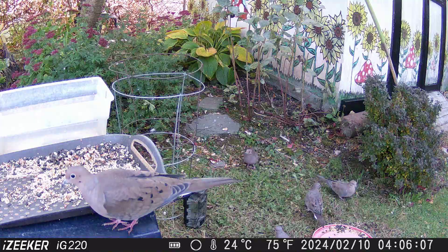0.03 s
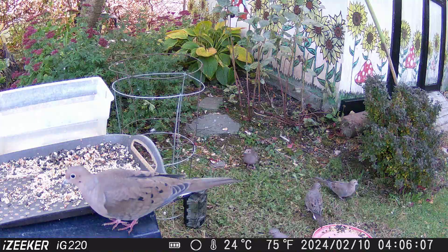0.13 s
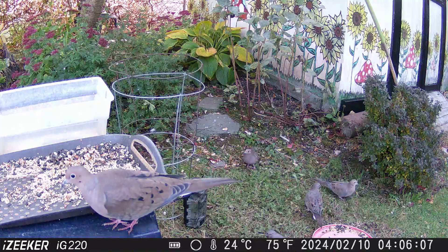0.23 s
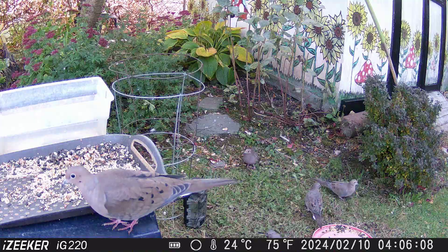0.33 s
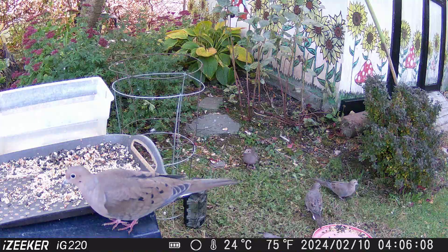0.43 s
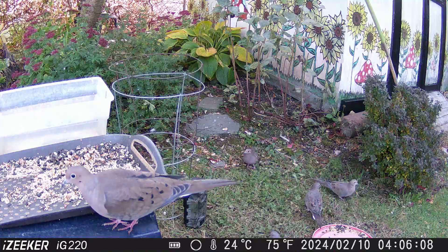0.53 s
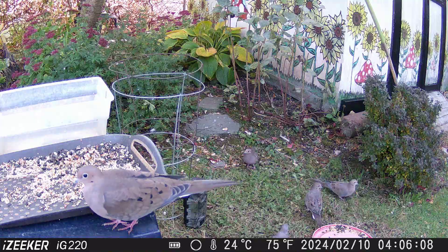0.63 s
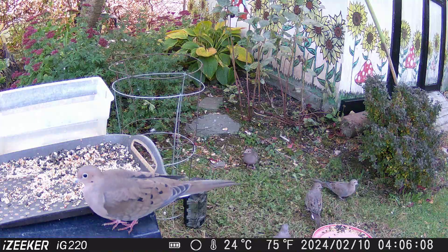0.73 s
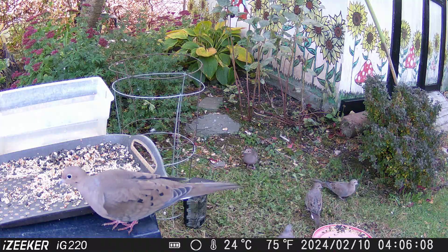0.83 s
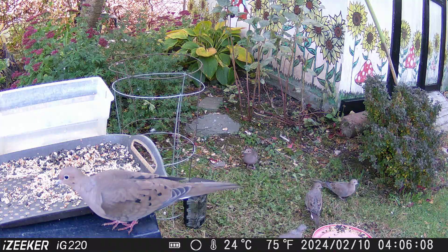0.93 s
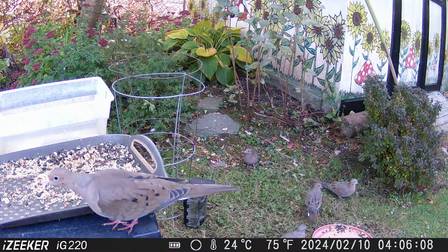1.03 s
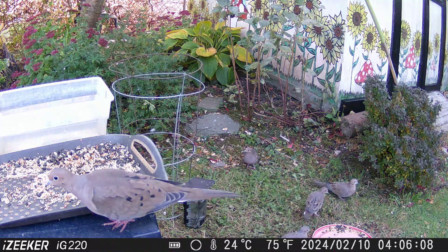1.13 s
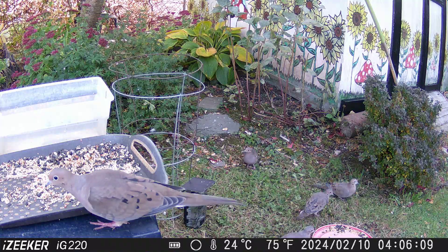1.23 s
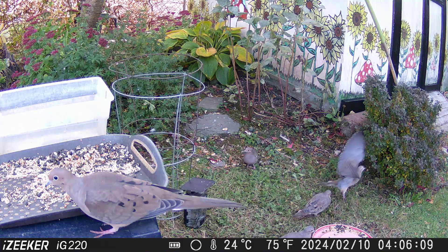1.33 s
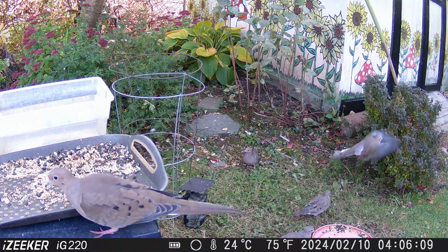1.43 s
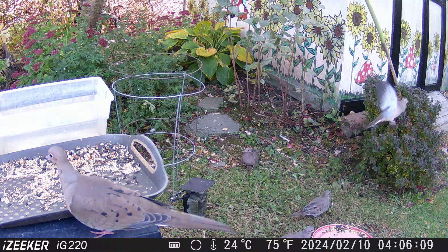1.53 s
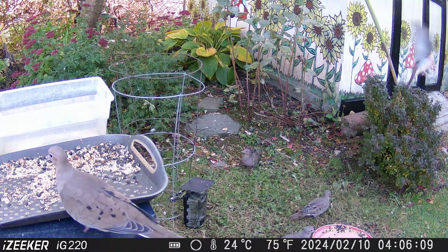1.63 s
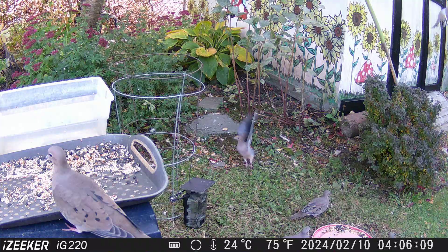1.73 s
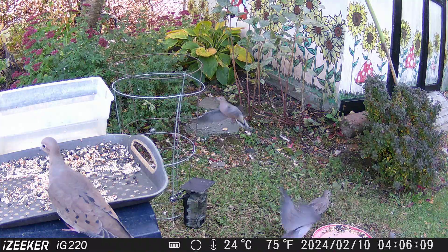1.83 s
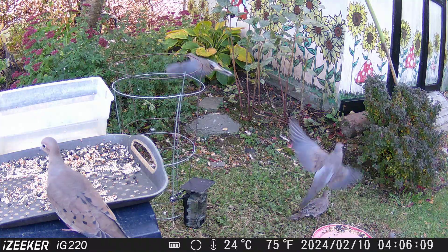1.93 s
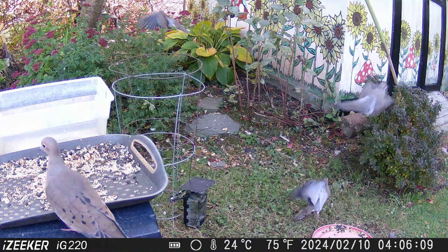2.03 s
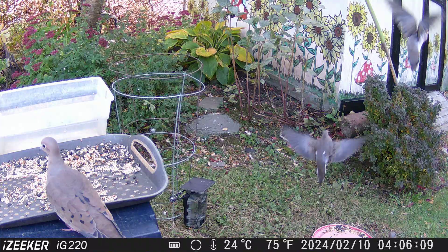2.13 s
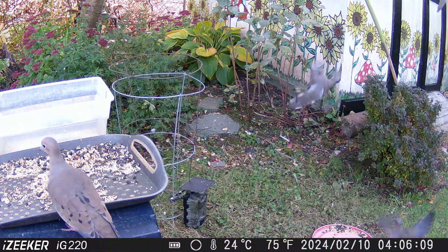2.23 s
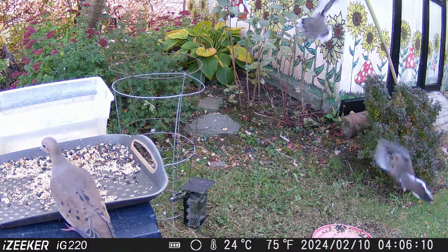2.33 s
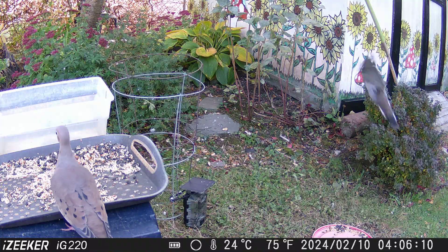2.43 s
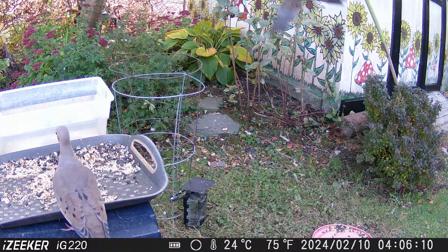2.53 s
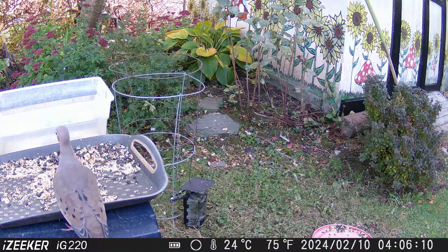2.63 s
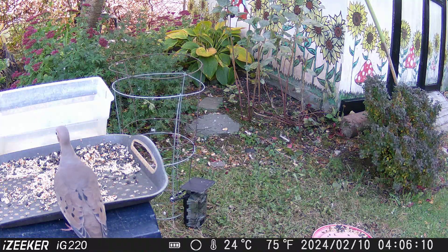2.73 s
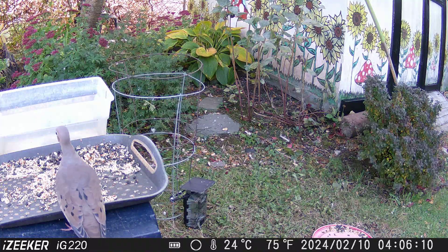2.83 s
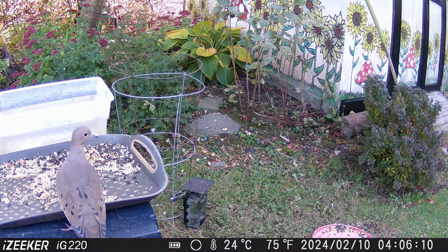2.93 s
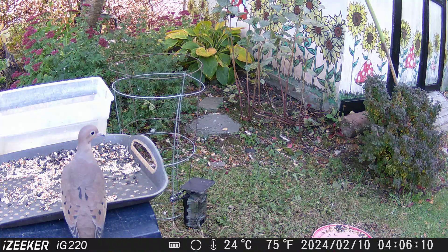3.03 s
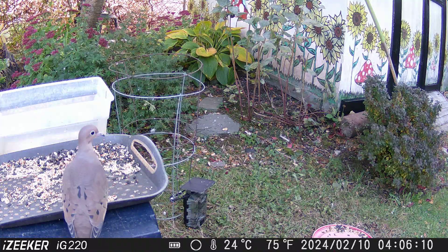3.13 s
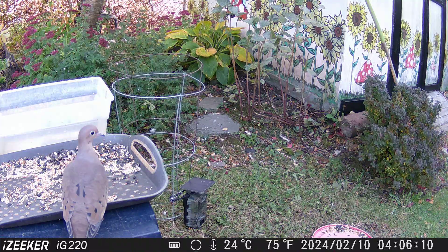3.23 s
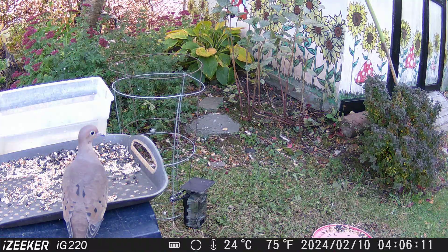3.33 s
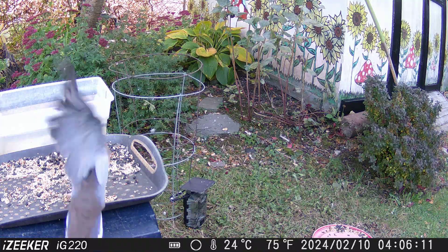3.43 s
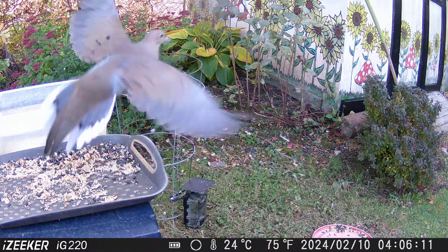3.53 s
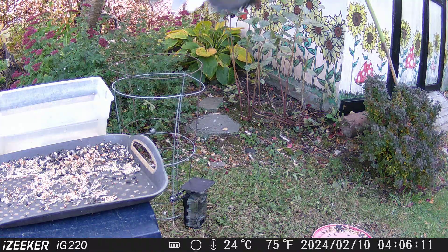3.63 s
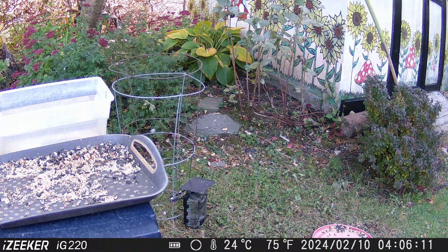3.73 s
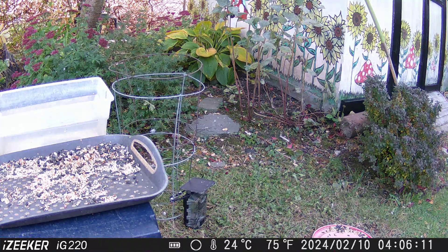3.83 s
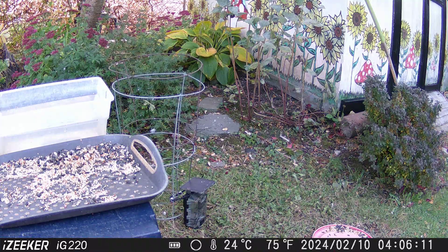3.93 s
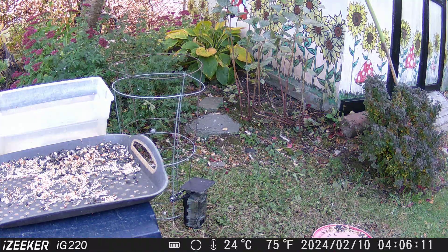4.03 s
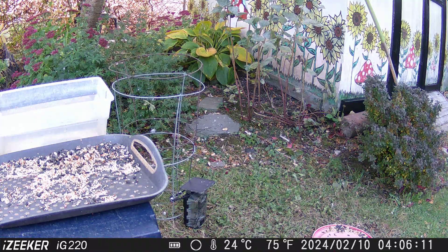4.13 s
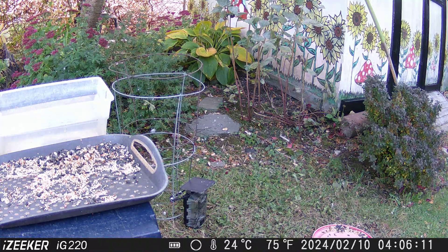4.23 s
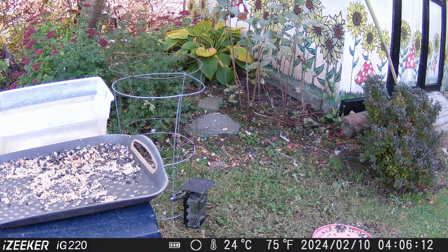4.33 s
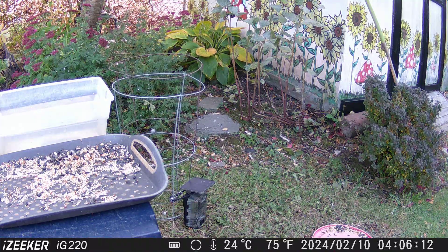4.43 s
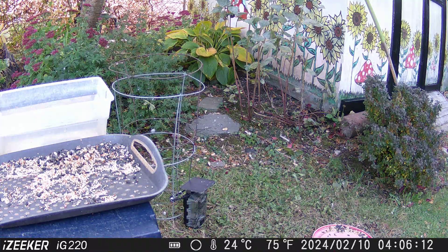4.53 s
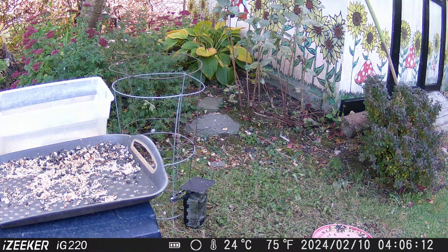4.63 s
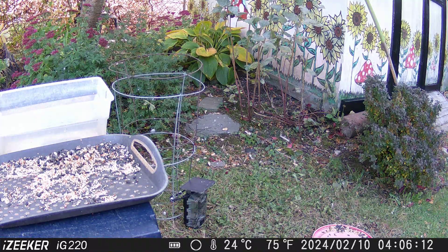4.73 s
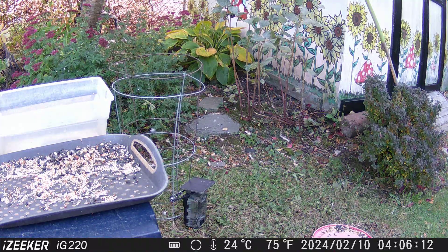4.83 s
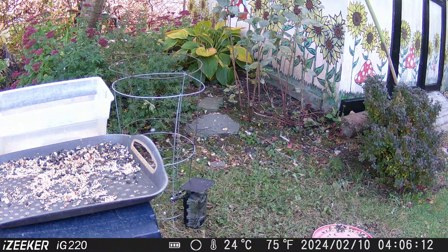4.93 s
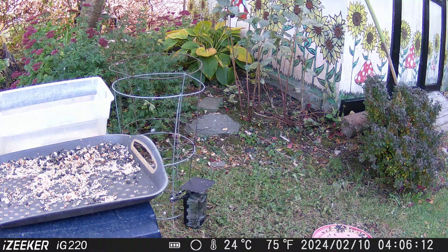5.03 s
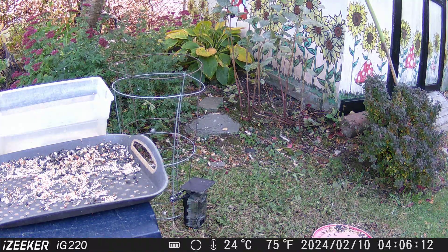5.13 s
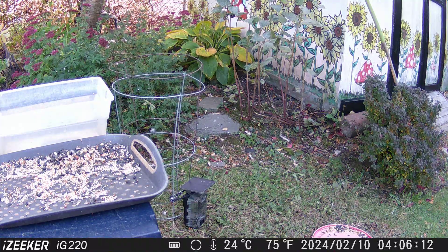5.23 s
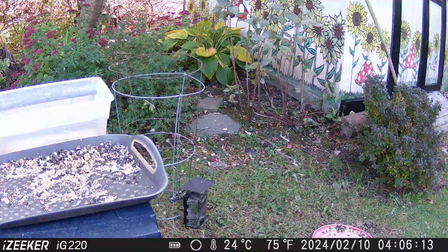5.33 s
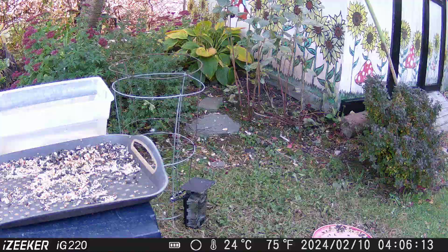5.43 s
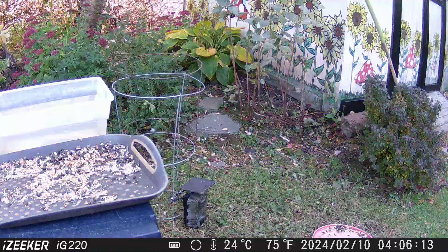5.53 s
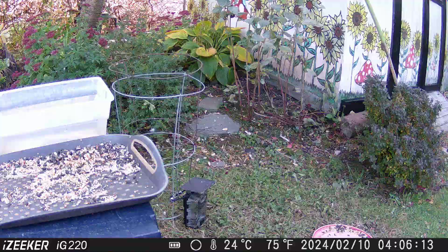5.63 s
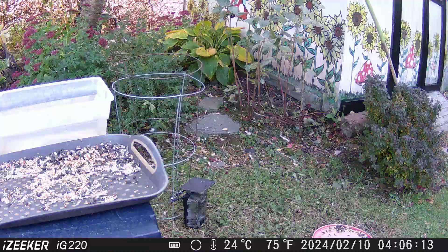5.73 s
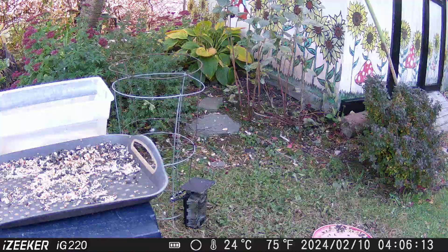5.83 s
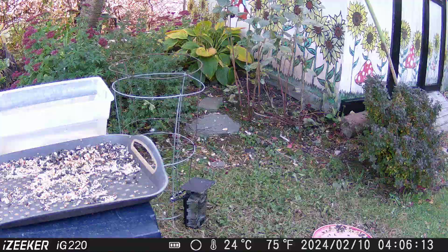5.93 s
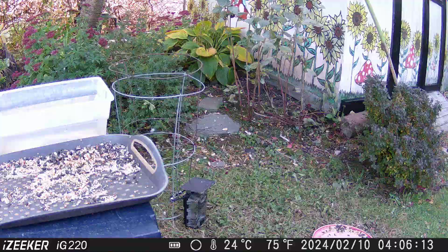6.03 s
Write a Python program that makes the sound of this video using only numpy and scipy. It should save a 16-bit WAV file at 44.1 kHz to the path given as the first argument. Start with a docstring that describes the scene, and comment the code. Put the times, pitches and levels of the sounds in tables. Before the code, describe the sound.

In a quiet backyard with a low, far-off town hum and one faint early knock, a group of doves suddenly takes off. Dry wing claps, rustling feathers and thumping air come first, then hollow fluttering slaps and quick high whistles on every beat. A last close bird bursts up loudly and whistles away. The hum remains, then a soft flurry and dull knocks. A small camera microphone close by gives limited treble.

```python
"""Over a steady distant town hum and a faint early knock, mourning doves burst up from a back yard.
Wing tips clap, and flurries of filtered noise rustle and push air, then fade as the birds leave.
Trapped air slaps in short falling tones; gliding tones whistle on each downstroke, with a lower,
softer note on each upstroke. Short yard echoes follow the wings; a last soft flurry and dull knocks
(ringing sines under noise) end it, all through the limited treble of a small trail camera."""
import sys
import numpy as np
from scipy import signal
from scipy.fft import rfft, irfft, next_fast_len
from scipy.io import wavfile
from scipy.ndimage import uniform_filter1d

SR = 44100
rng = np.random.default_rng(int(sys.argv[2]) if len(sys.argv) > 2 else 0)


def waveform_to_disk(signal):
    """Save audio, clipped to [-1, 1], as 16-bit WAV at the path in sys.argv[1]."""
    frames = np.transpose(np.atleast_2d(signal))
    scaled = np.clip(frames, -1, 1) * 32767
    samples = np.round(scaled).astype(np.int16)
    wavfile.write(sys.argv[1], SR, samples)


N = 268789
T = np.arange(N) / SR
SIZE = next_fast_len(N, real=True)
FREQS = np.fft.rfftfreq(SIZE, 1 / SR)

# Spectra give only a tone colour; the sound that uses one sets its strength.
# broad breath of vanes through air: (frequency [Hz], relative level per Hz [dB])
SWISH_SPECTRUM = [(120, -20.5), (250, 1), (600, 1), (1000, 0), (1600, -3), (2300, -3.5), (3100, -19.5),
                  (4500, -34.5), (9000, -41.5)]
# bright scrape of quills: (frequency [Hz], relative level per Hz [dB])
FIZZ_SPECTRUM = [(1000, -22.5), (2500, -5.5), (3500, -13.5), (4700, -23), (6000, -8.5), (7200, 4),
                 (8200, -11.5), (9000, -25.5)]


def gain_of(db):
    """Decibels to amplitude."""
    return 10 ** (np.asarray(db) / 20)


def evened(x):
    """Scales to unit rms."""
    return x / np.sqrt(np.mean(x ** 2) + 1e-20)


def steadied(x, size):
    """Evens out a noise's chance swells over `size` samples, so an envelope can set its strength."""
    return x / np.sqrt(uniform_filter1d(x ** 2, size=size) + 1e-6)


def add(mix, start_s, sound):
    """Mixes a sound in at its start time."""
    part = mix[round(start_s * SR):][:len(sound)]
    part += sound[:len(part)]


def coloured(x, spectrum):
    """Filters x by a spectrum, joined up over log frequency, at unit rms."""
    hz, db = np.transpose(spectrum)
    gain = gain_of(np.interp(np.log(FREQS + 1), np.log(hz + 1), db))
    return evened(irfft(rfft(x, SIZE) * gain, SIZE)[:N])


def noise(spectrum):
    """Random noise of a given spectrum, at unit rms."""
    return coloured(rng.standard_normal(N), spectrum)


def wander(rate_hz):
    """A smooth random curve: noise kept mostly below the given rate, at unit rms."""
    lowpass = 1 / (1 + (FREQS / rate_hz) ** 4)
    return evened(irfft(rfft(rng.standard_normal(SIZE)) * lowpass, SIZE)[:N])


def bursts(times, dbs, decay, rise):
    """An envelope of quick rises and exponential falls, both with time constants in seconds."""
    out, t = np.zeros(N), np.arange(SR // 3) / SR
    shape = (1 - np.exp(-t / rise)) * np.exp(-t / decay)
    for start, db in zip(times, dbs):
        add(out, start, gain_of(db) * shape)
    return out


def yard():
    """The steady far hum of the town, as noise weighted to the lows."""
    # town hum: (frequency [Hz], relative level per Hz [dB])
    hum_spectrum = [(12, -40.5), (20, 2), (92, -0.5), (158, -11), (194, -11.5), (232, -14.5), (331, -22),
                    (416, -21), (449, -24), (918, -19.5), (1880, -33.5), (2130, -34.5), (4700, -60.5),
                    (7630, -47.5), (8890, -71), (11600, -87), (19600, -120)]
    return gain_of(-49) * noise(hum_spectrum)


def knocks(clatter_decay):
    """Distant bumps: a hollow body rings in decaying sines under a short noisy clatter."""
    # dull knocks in the yard: (time [s], low boom level [dB], clatter level [dB])
    knock_events = [(0.214, -64, -52), (5.189, -44, -63), (5.468, -42.5, -50), (5.907, -50.5, -64),
                    (5.94, -52, -44), (5.97, -58, -57), (6.031, -65, -58.5)]
    # resonances of the hollow body: (frequency [Hz], relative level [dB], time to fall 60 dB [s])
    boom_modes = [(208.5, 1.5, 0.36), (231.4, -5, 0.32), (480, -1.5, 0.068)]
    # clatter colour: (frequency [Hz], relative level per Hz [dB])
    clatter_spectrum = [(200, -2.5), (450, 11.5), (800, 0), (1300, 8.5), (1900, -8.5), (2500, -5),
                        (4000, -38), (7200, -52), (9000, -49)]
    times, boom_dbs, clatter_dbs = np.transpose(knock_events)
    out = noise(clatter_spectrum) * bursts(times, clatter_dbs, clatter_decay, rise=0.00074)

    t = np.arange(SR // 3) / SR
    ring = sum(gain_of(db - 60 * t / t60) * np.sin(2 * np.pi * hz * t) for hz, db, t60 in boom_modes)
    boom = ring * (1 - np.exp(-t / 0.0023))  # softened onset
    for start, db in zip(times, boom_dbs):
        add(out, start, gain_of(db) * boom)
    return out


def claps(crack_db, body_db):
    """Wing tips meet: a bright crack of quills over a duller, longer smack of the vanes."""
    # wing-tip claps, before the overall trims: (time [s], crack level [dB], body level [dB])
    clap_events = [(1.3722, -57, -50.5), (1.4119, -51, -47.5), (1.463, -56, -55), (1.5198, -46, -48.5),
                   (1.553, -44, -38), (1.5869, -36.5, -43), (1.6255, -47, -42.5), (1.637, -38, -36),
                   (1.703, -56, -48), (1.74, -51, -43.5), (1.7979, -43, -44.5), (2.027, -45, -39),
                   (2.2823, -41.5, -55), (2.3273, -43, -36.5), (2.344, -51, -32.5), (2.7472, -50.5, -42),
                   (3.1767, -46.5, -47.5), (3.252, -44.5, -43), (3.3303, -55, -57), (3.516, -49.5, -34.5),
                   (3.555, -58, -42), (3.623, -52.5, -38), (3.6417, -42, -33), (3.678, -43.5, -39),
                   (4.040, -53, -40), (4.0926, -51.5, -40.5), (4.2176, -48.5, -44.5), (4.407, -47.5, -47.5),
                   (4.4831, -50.5, -47.5), (4.75, -57, -47.5)]
    crack_decay = 0.0029  # s
    times, cracks, bodies = np.transpose(clap_events)
    crack_env = bursts(times, cracks + crack_db, crack_decay, rise=0.00015)
    body_env = bursts(times, bodies + body_db, 1.48 * crack_decay, rise=0.00027)
    quills = steadied(noise(FIZZ_SPECTRUM), size=130) * crack_env
    vanes = steadied(noise(SWISH_SPECTRUM), size=220) * body_env
    return quills + vanes


def flurries(rise_db_per_s):
    """Gains of swish, fizz, push and buffet: each flurry builds, holds, then falls with distance."""
    # flurries of wings close by, before each sound's trim: (hold start [s], hold length [s],
    # half the time to double the distance [s], swish level [dB], fizz level [dB],
    # air push level [dB], buffet level [dB])
    flurry_events = [ (1.391, .06, .03, -74, -74, -48, -59), (1.517, 0.09, 0.23, -53, -63.5, -31, -43),
                     (2.044, 0.12, .08, -49, -61, -28, -45), (2.309, 0.044, 0.11, -44.5, -58, -26, -40),
                     (3.553, 0.11, 0.037, -54, -64.5, -26.5, -43.5),
                     (4.023, 0.13, 0.22, -59, -70, -38, -51),
                     (5.038, .44, 0.052, -62.5, -90.5, -51.5, -55.5)]
    ease_db_per_s = 5.5  # flapping eases once aloft
    power = np.zeros((4, N))
    for start, hold, leave, *dbs in flurry_events:
        before = np.maximum(start - T, 0)
        after = np.maximum(T - start - hold, 0)
        effort = gain_of(-rise_db_per_s * before - ease_db_per_s * after)
        distance = np.hypot(1, np.sqrt(3) * after / (2 * leave))  # relative to the hold
        power += np.outer(gain_of(dbs), effort / distance) ** 2
    return np.sqrt(power)


def draught(draught_db, buffet_db):
    """Swirls of air from each flurry press on the microphone; smaller eddies buffet it."""
    # slow swirls: (frequency [Hz], relative level per Hz [dB])
    air_spectrum = [(8.8, -38), (15, 6.5), (32, 1.5), (46, 3.5), (80, -10), (193, -33), (265, -47),
                    (400, -43), (520, -61), (880, -120)]
    # smaller eddies: (frequency [Hz], relative level per Hz [dB])
    buffet_spectrum = [(30, -22), (65, 0.5), (110, 0.5), (170, -5.5), (260, -15.5), (400, -23),
                       (800, -51.5)]
    _, _, push, buffet = flurries(rise_db_per_s=167.5)
    swirls = steadied(noise(air_spectrum), size=2400) * push * gain_of(draught_db)
    eddies = steadied(noise(buffet_spectrum), size=1200) * buffet * gain_of(buffet_db)
    return swirls + eddies


def rustle(swish, fizz, swish_db, fizz_db, flap_db, grain_db, grains_per_s):
    """Feathers sweep the air and scrape over each other in uneven surges."""
    surge = evened(gain_of(flap_db * np.tanh(wander(24))))
    # sparse random clicks of uneven size
    sizes = gain_of(grain_db * np.minimum(rng.exponential(1, N), 4))
    signs = rng.choice([-1., 1.], N)
    scrapes = evened(sizes * signs * (rng.random(N) < grains_per_s / SR))
    sweep = coloured(scrapes + rng.standard_normal(N), SWISH_SPECTRUM) * swish * gain_of(swish_db)
    scratch = coloured(scrapes, FIZZ_SPECTRUM) * fizz * gain_of(fizz_db)
    return surge * (sweep + scratch)


def flicks(swish, fizz, per_s, swish_db, fizz_db, spread_db, decay):
    """Small chance collisions of feathers, as short noise taps that follow the flurry's strength."""
    chance, size = rng.random((3000, 2)).T
    times = np.linspace(0, T[-1], len(chance))
    hit = chance < per_s * (times[1] - times[0])
    taps = bursts(times[hit], -spread_db * size[hit], decay, rise=0.0014)
    soft = noise(SWISH_SPECTRUM) * swish * gain_of(swish_db)
    bright = noise(FIZZ_SPECTRUM) * fizz * gain_of(fizz_db)
    return taps * (soft + bright)


def slaps(glide, slap_db, rough, puff_db):
    """Ragged cycles of trapped air, falling in pitch as the pocket under the wing opens and puffs."""
    # hollow slaps, before the overall trim: (middle time [s], level [dB], mid-slap pitch [Hz])
    slap_events = [(1.589, -41, 490), (1.604, -42, 750), (2.316, -32, 840), (2.332, -35, 715),
                   (2.346, -29, 816), (2.395, -35.5, 597), (2.414, -34, 620), (2.474, -31, 593),
                   (2.511, -40, 730), (2.540, -28.5, 612), (3.516, -38, 884), (3.570, -40.5, 470),
                   (3.636, -44, 270)]
    out, ragged = np.zeros(N), wander(1000)
    puff = steadied(noise(SWISH_SPECTRUM), size=220)
    for middle, db, hz in slap_events:
        length = 5.8 / hz  # a fixed number of cycles, so lower slaps last longer
        near = abs(T - middle) < 2 * length
        u = (T[near] - middle) / length
        turns = np.cumsum(hz * np.exp(-glide * np.tanh(u))) / SR + rng.random()
        tone = np.sin(2 * np.pi * turns + rough * ragged[near])
        pocket = tone + gain_of(puff_db) * puff[near]
        out[near] += gain_of(db + slap_db) * pocket / np.cosh(4 * u)
    return out


def wingbeats():
    """Down- and upstrokes of all bouts: rows of middle s, dB, pitch Hz, length s, sweep, breathiness."""
    # bouts of wingbeats, before scatter: (first beat [s], last beat [s], beats [count],
    # loudest time [s], level [dB], fade either side [dB/s], pitch [Hz], stroke length [s],
    # pitch sweep over a stroke [share], breathiness [0-1], upstroke against downstroke [dB])
    bout_table = [ (1.825, 2.446, 10, 2.24, -40.5, 32, 2520, 0.023, .13, .6, -8),
                  (1.915, 2.138, 4, 2.08, -37.5, 19, 2420, .015, -.1, 0.15, -14),
                  (2.573, 3.143, 8, 2.74, -44.5, 16, 2380, .037, .1, .45, -5),
                  (2.699, 3.023, 5, 2.79, -47, 17, 2224, 0.022, .03, 0.08, -12.5),
                  (3.243, 3.428, 3, 3.39, -53, 16, 2170, .046, .02, .1, -14),
                  (3.52, 3.819, 5, 3.65, -37.5, 38.5, 2350, 0.02, -.02, .25, -6),
                  (3.89, 4.118, 4, 4.06, -48, 57.5, 2427, .019, .1, 0.27, -3.5),
                  (4.203, 4.354, 3, 4.31, -41.5, 16, 2406, 0.026, .04, .05, -11.5),
                  (4.432, 4.925, 7, 4.63, -52, 32, 2294, 0.03, -.03, .25, -7)]
    slowing = 0.05  # the beat lengthens by about twice this share through a bout
    pitch_per_db = 0.007  # a harder stroke whistles higher, by this share
    scatter_db, pitch_scatter, sweep_scatter = 1.0, 0.015, 0.06  # pitch and sweep as shares
    wing2_s, wing2_db, wing2_pitch = 0.016, -8, 0.92  # the second wing trails, softer and lower
    up_lead_s = 0.039  # the wings lift just before each downstroke
    up_hz, up_s, up_sweep, up_breathy = 1656, 0.015, -0.08, 0.12
    down, up = [], []
    for first, last, beats, loudest, top_db, fade, top_hz, length, sweep, breathy, up_db in bout_table:
        u = np.linspace(0, 1, round(beats))
        times = first + (last - first) * (u - slowing * u * (1 - u))
        for s, chance in zip(times, rng.standard_normal((len(u), 5))):
            effort_db = scatter_db * chance[0] - fade * abs(s - loudest)
            db = top_db + effort_db
            hz = top_hz * (1 + pitch_per_db * effort_db + pitch_scatter * chance[1])
            slips = sweep_scatter * chance[2:]
            down.append((s, db, hz, length, sweep + slips[0], breathy))
            down.append((s + wing2_s, db + wing2_db, hz * wing2_pitch, length, slips[1], breathy))
            up.append((s - up_lead_s, db + up_db, up_hz, up_s, up_sweep + slips[2], up_breathy))
    return down, up


def whistles(strokes, arch, jitter, shimmer, spread_hz, second_db, third_db):
    """Fluttering feathers: pitch arches with the wing's speed, most in short, sharp strokes."""
    out, wobble, flutter = np.zeros(N), wander(130), wander(120)
    # neighbouring feathers flutter out of step and smear the tone into a band
    smear = (wander(spread_hz) + 1j * wander(spread_hz)) / np.sqrt(2)
    for middle, db, hz, length, sweep, breathy in strokes:
        near = abs(T - middle) < length
        breathy = np.clip(breathy, 0, 1)
        u = (T[near] - middle) / length
        force = np.exp(-abs(u / .5) ** 3)

        bend = sweep * u - arch * min(1, 0.035 / length) ** 2 * u ** 2
        unsteady = jitter * np.sqrt(breathy) * wobble[near]
        turn = np.exp(2j * np.pi * np.cumsum(hz * (1 + bend + unsteady)) / SR)
        voice = np.sqrt(1 - breathy) + np.sqrt(breathy) * smear[near]
        first = turn * voice * np.exp(shimmer * flutter[near])
        first /= np.sqrt(np.average(abs(first) ** 2, weights=force ** 2))  # even strokes

        # turning by the first harmonic's phase again gives the second and third
        step = np.exp(1j * np.angle(first))
        tone = first * (1 + gain_of(second_db) * step + gain_of(third_db) * step ** 2)
        out[near] += gain_of(db) * force * tone.imag
    return out


def whooshes(strokes, swish_db, fizz_db):
    """Every stroke also sweeps a broad puff of air, in proportion to its whistle."""
    force = np.zeros(N)
    for middle, db, _, length, _, _ in strokes:
        add(force, middle - length, gain_of(db) * np.hanning(round(2 * length * SR)) ** 2)
    breath = gain_of(swish_db) * noise(SWISH_SPECTRUM) + gain_of(fizz_db) * noise(FIZZ_SPECTRUM)
    return force * breath


def fences(x, t60):
    """Scattered echoes from ground, fence and house wall; the open yard holds them only briefly."""
    t = np.arange(SR // 4) / SR
    signs = rng.choice([-1., 1.], len(t))
    taps = signs * (rng.random(len(t)) < 1500 / SR) * (t > .004)  # 1500 echoes/s after 4 ms
    tail = taps * gain_of(-60 * t / t60)
    return signal.fftconvolve(x, tail / np.linalg.norm(tail))[:N]


def scene():
    """Wings, their echoes, the air they push, the knocks and the town hum."""
    downstrokes, upstrokes = wingbeats()
    swish, fizz, _, _ = flurries(rise_db_per_s=116)
    wings = claps(crack_db=-1.5, body_db=1.0)
    wings += rustle(swish, fizz, swish_db=-3.5, fizz_db=-4.0, flap_db=6.3, grain_db=4.5, grains_per_s=2000)
    wings += flicks(swish, fizz, per_s=80, swish_db=10, fizz_db=8, spread_db=9.5, decay=0.003)
    wings += slaps(glide=0.328, slap_db=1.0, rough=0.35, puff_db=-11.5)
    wings += whistles(downstrokes, arch=0.141, jitter=0.05, shimmer=0.45, spread_hz=223,
                      second_db=-33, third_db=-21.5)
    wings += whistles(upstrokes, arch=0.14, jitter=0.06, shimmer=0.45, spread_hz=730,
                      second_db=-22.5, third_db=-28.5)
    wings += whooshes(downstrokes, swish_db=-18.5, fizz_db=-27)
    wings += whooshes(upstrokes, swish_db=-8.5, fizz_db=-25)
    echoes = gain_of(-14.5) * fences(wings, t60=0.2)
    air = draught(draught_db=1.0, buffet_db=-1.5)
    return (yard() + knocks(clatter_decay=0.013) + wings + echoes + air)[None]


def record(dry):
    """The camera's band limit: a steep low-pass at 8800 Hz."""
    lowpass = signal.firwin(301, 8800, window=("kaiser", 8), fs=SR)
    return signal.oaconvolve(dry, lowpass[None], "same")


dry = scene()
out = record(dry)
waveform_to_disk(out)
```